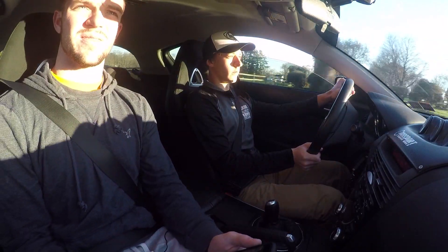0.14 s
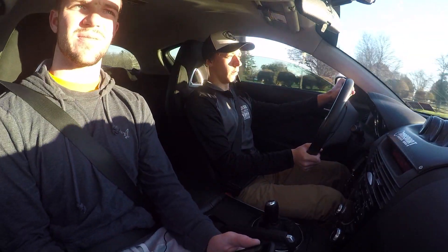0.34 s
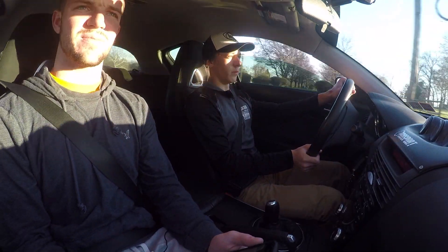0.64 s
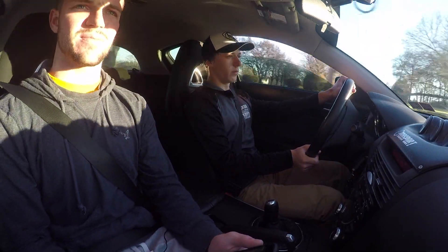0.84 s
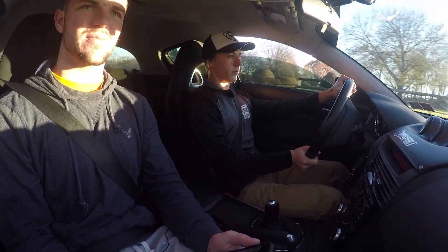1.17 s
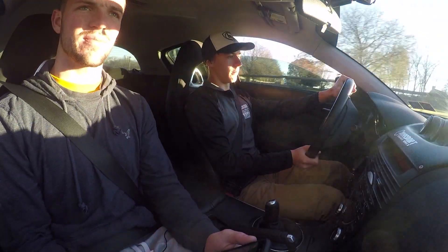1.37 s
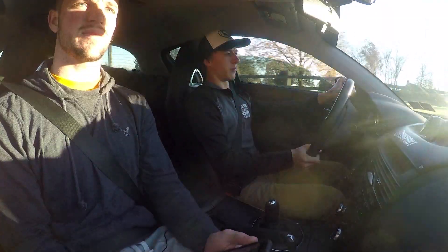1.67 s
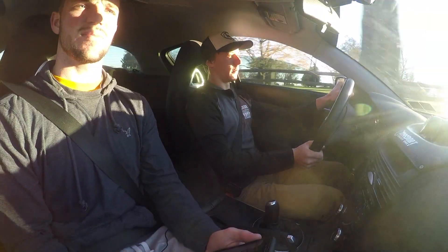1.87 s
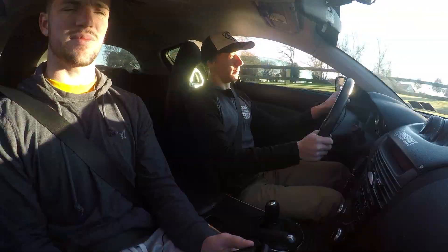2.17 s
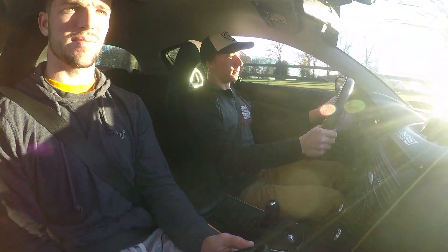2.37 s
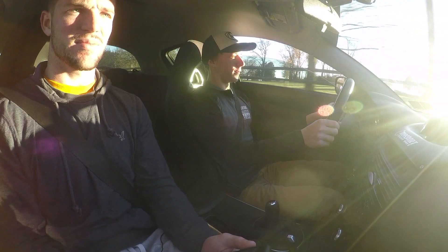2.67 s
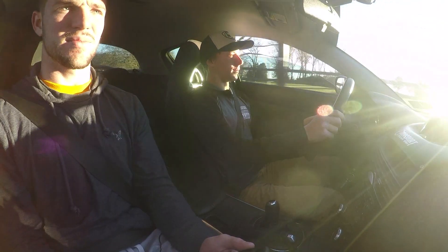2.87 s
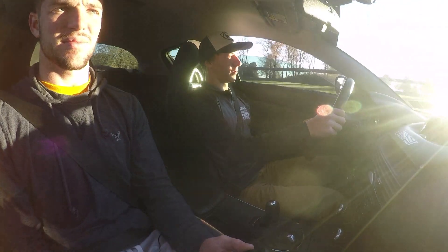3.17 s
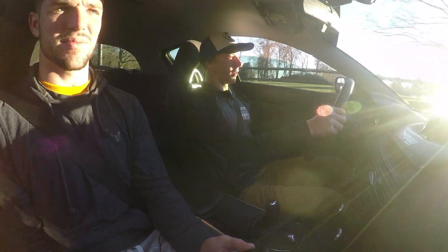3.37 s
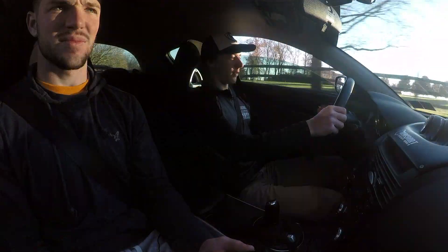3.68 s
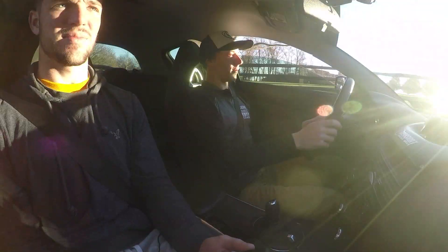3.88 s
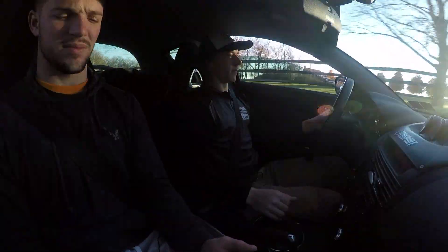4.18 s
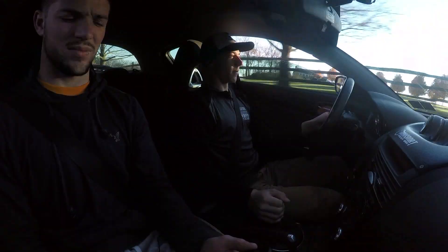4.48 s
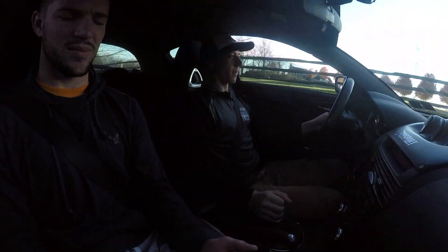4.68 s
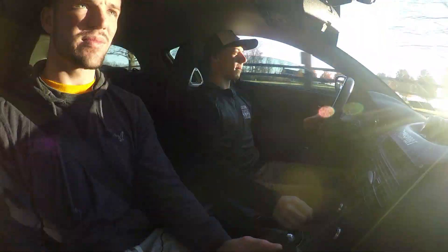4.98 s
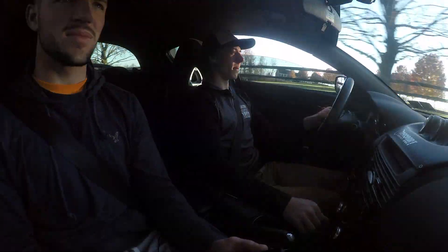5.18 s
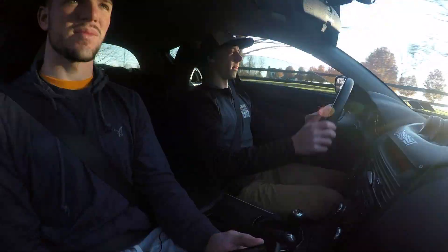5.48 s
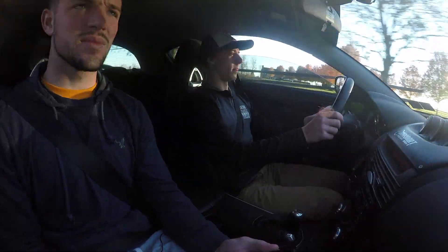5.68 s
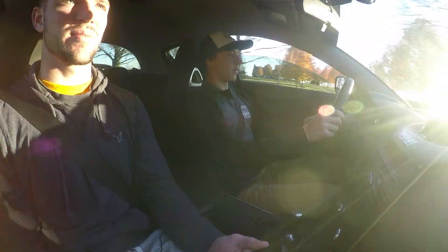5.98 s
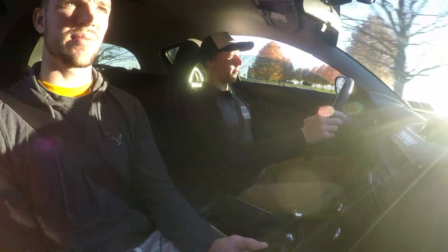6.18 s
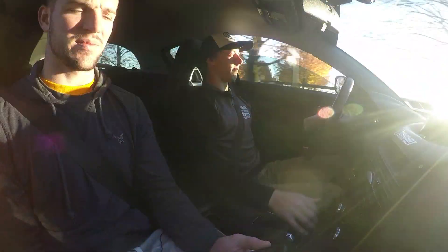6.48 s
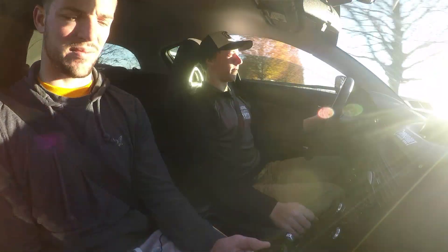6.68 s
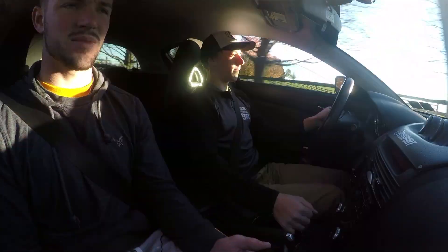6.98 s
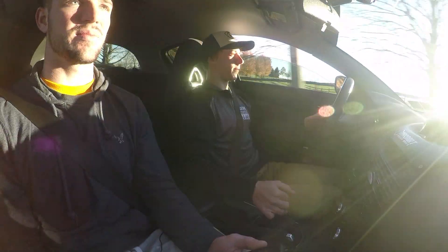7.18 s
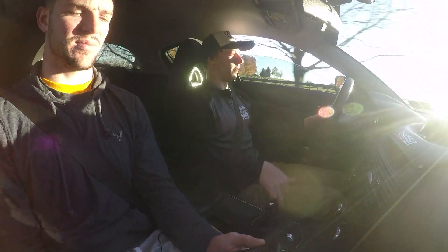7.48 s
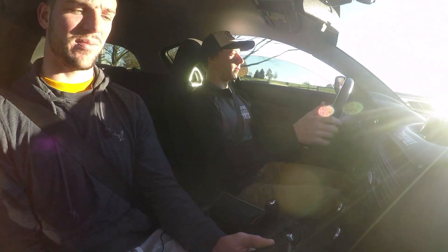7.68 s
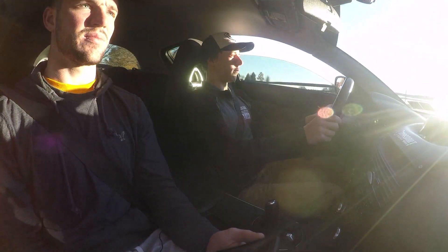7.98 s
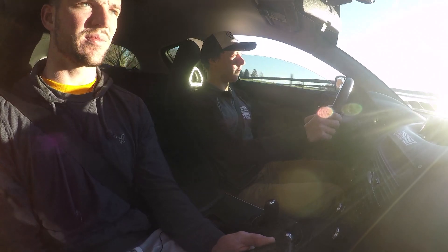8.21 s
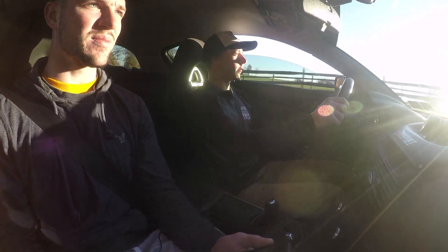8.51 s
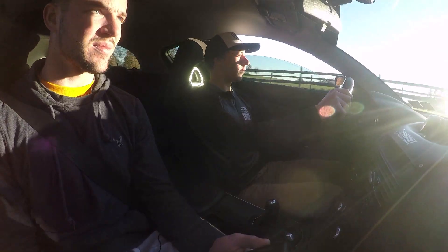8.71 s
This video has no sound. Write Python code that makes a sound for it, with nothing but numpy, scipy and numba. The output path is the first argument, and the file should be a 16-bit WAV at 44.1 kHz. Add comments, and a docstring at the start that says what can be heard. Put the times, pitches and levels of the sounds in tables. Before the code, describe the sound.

A car engine revs hard into a loud, distorted exhaust rasp, then lifts off with thumps and pops and coasts on a drone.

```python
"""On the road, close to the open tailpipe of a moving car with a two-rotor engine.
It pulls hard up the revs: firings boom and bark in the pipe, then steepen into a rasp that overloads
the microphone. It lifts with a thump, pops on the gear change, coasts on a drone and is blipped for a
downshift. A loose fitting squeaks faintly, and tyre and wind roar lie under it all."""
import sys
import numpy as np
from scipy import signal
from scipy.fft import rfft, irfft
from scipy.io import wavfile
from scipy.ndimage import uniform_filter1d
from numba import njit

SR = 44100
rng = np.random.default_rng(int(sys.argv[2]) if len(sys.argv) > 2 else 0)


def waveform_to_disk(signal):
    """Save audio, clipped to [-1, 1], as 16-bit WAV at the path in sys.argv[1]."""
    frames = np.transpose(np.atleast_2d(signal))
    scaled = np.clip(frames, -1, 1) * 32767
    samples = np.round(scaled).astype(np.int16)
    wavfile.write(sys.argv[1], SR, samples)


N = 390279

# firing rate, one firing from each rotor to a shaft turn: t/s, f/Hz
FIRING_RATE = [(0, 158), (.26, 154.2), (.98, 154), (1.12, 156.8), (1.56, 158.6), (2.13, 168.9),
               (2.62, 181.5), (3.95, 219.2), (4.7, 240.5), (5.04, 248.3), (5.51, 209.5), (5.68, 168.9),
               (5.89, 172.8), (6.6, 166.2), (7.17, 155.7), (7.71, 112.7), (7.8, 149.6), (7.89, 196.4),
               (8.03, 196.6), (8.33, 191.6), (8.85, 170.5)]
# engine load for the pull and for the blip: t/s, level/dB re full load
PULL_LOAD = [(.26, -38), (.34, -28), (.5, -23), (1, -19), (1.12, -15.5), (1.8, -11), (2.75, 0.5), (3.5, -1),
             (4.9, 0), (5.03, -3.5)]
BLIP_LOAD = [(7.71, -11), (7.78, -8), (7.82, -5.5), (7.88, -7)]
# open throttle: opens t/s, shuts t/s
THROTTLE_SPANS = [(-.1, 5.047), (7.708, 7.886)]
# exhaust voices by name: level/dB at full load and mid revs, slope/dB per load dB, slope/dB per Hz
EXHAUST_VOICES = {"boom": (-8.5, 0.55, 0), "bark": (-8.5, 0.99, -0.0075), "rasp": (-13, 1.1, -0.014),
                  "hiss": (-28.5, 1.14, 0.081)}
# the boom swells and sags across the pipe's resonances: firing f/Hz, level/dB
BOOM_RESONANCES = [(115, 10), (155, 1.5), (178, 1.3), (198, -2.5), (216, 2), (248, -2.5)]
# the pipe with the throttle shut: firing f/Hz, boom level/dB, overtone level/dB
DRONE_LEVELS = [(115.85, -18.5, -63), (135, -20, -36.5), (159, -19.5, -33.5), (171, -17.5, -30.5),
                (185.2, -18, -33), (194.2, -20.5, -23.5), (200.5, -20.5, -36.5), (212.7, -19, -25.5),
                (224, -25.5, -36.5), (240, -35, -33.5)]
# slugs of gas and afterfire: t/s, thump level/dB, f/Hz at the crest, rise t/s, spit level/dB
AFTERFIRE = [(5.044, -11, 44, 0.02, -41), (5.5848, -7, 75.4, .021, -21), (7.703, -5.5, 65, 0.016, -22),
             (7.76, -15, 70, 0.016, -24.5), (7.88, -12.5, 46.4, 0.024, -46.5), (8.086, -8.5, 58, .016, -31)]
# weak stray firings on the overrun: t/s, level/dB, centre f/Hz, decay t/s
STRAY_FIRINGS = [(5.546, -18, 494, 0.026), (5.952, -19, 1000, 0.0095)]
# the pipe's tone colours for the firing pulses: f/Hz, level/dB
BARK_EQ = [(200, -33), (290, -30), (345, -14.5), (400, -9.5), (460, 4), (510, 2.5), (590, 4.5), (680, -3.5),
           (750, -3), (820, -13.5), (950, -39), (3000, -89.5)]
RASP_EQ = [(400, -20), (570, 4.5), (650, -3.5), (740, -1.5), (900, -20), (1080, -1.5), (1170, 5.5),
           (1320, 2), (1480, -6.5), (1720, -1), (2050, -6), (2250, -12), (2550, -8), (3100, -23.5),
           (3750, -12.5), (4500, -14), (5400, -26.5), (8000, -39)]
DRONE_EQ = [(200, -44), (290, -1.5), (390, 3.5), (500, 2), (600, -11), (700, -3), (850, -30.5), (1300, -23),
            (3500, -71)]
# noise colours of churning gas, exhaust jet, intake, pops, tyres and rushing air: f/Hz, level/dB
CHURN_EQ = [(25, -7.5), (110, 0.5), (280, -15.5), (480, 0.5), (750, -1.5), (920, -19), (1200, -10),
            (1900, -12), (2600, -21), (3500, -39), (9000, -84)]
HISS_EQ = [(1600, -23), (2700, 0), (3350, -6), (4050, -0.5), (4500, -4), (5400, -8.5), (6000, -4),
           (7100, -1), (8200, -8.5), (10000, -14.5), (12800, -26.5), (15000, -43), (17000, -65)]
INTAKE_EQ = [(3000, -41), (3750, -10), (4100, 2), (4300, -9), (4550, -19), (6000, -45.5)]
SPIT_EQ = [(100, 6), (600, 7), (1400, 0), (3000, -6), (4200, -2.5), (5200, -8), (7200, 1), (10000, -13.5),
           (15000, -36)]
TYRE_EQ = [(20, -13.5), (50, 0.5), (80, -4), (260, -2.5), (480, -12.5), (580, -12.5), (800, -13),
           (1100, -8), (1700, -23), (3200, -36.5), (4150, -32.5), (5200, -41.5), (7500, -40), (15000, -72)]
RUSH_EQ = [(600, -26), (1400, 7), (2400, 1.5), (3200, -16.5), (5200, -19.5), (7500, -23), (10500, -29),
           (15000, -50)]
# jolts that rub the loose fitting: t/s, level/dB
JOLTS = [(.685, -60), (1.085, -49), (1.105, -50), (5.1, -51), (5.2, -51), (5.23, -50), (5.9, -49.5)]
# rough road that sets off fainter squeaks: from t/s, to t/s, level/dB
ROUGH_STRETCHES = [(0.353, 1, -52), (8.253, 8.65, -53)]
# the fitting's ring: f/Hz, level/dB
FITTING_MODES = [(9060, -1.5), (9750, -8)]
# the car gathers speed, then slows: t/s, roar level/dB, buffeting level/dB
ROAD_LEVELS = [(0, -35.5, -41), (2, -30, -46), (4, -27.5, -38), (5.8, -28.5, -34.5), (8.85, -32, -44)]

MID_REVS_HZ = 169
SHUDDER_HZ, SHUDDER_DEPTH_HZ, SHUDDER_CREST_S = 4.08, 0.44, 1.225
LIGHT_LOAD_DB, LIGHT_LOAD_SLOPE = -21.5, 0.42
BARK_LOAD_DB, BARK_KNEE_DB, BARK_SOFT_DB, BARK_FLOOR_DB = -18, 3.5, -10, -41.5
EDGE_HZ, EDGE_MIN_HZ, EDGE_LOAD_DB_PER_OCTAVE, EDGE_OCTAVES_PER_HZ = 3270, 1060, 9, 0.0014
INTAKE_DB, INTAKE_BY_LOAD = -41.5, 0.78
CHOKE_DB, CHOKE_S = -12, 0.038
SQUEAKS_PER_S = 8.7
TOP_HZ = 15300


def on_throttle(phase, hz):
    """Firings ring the pipe: boom, bark, rasp and hiss each ride the load and the revs."""
    load_db, = curves(list(PULL_LOAD) + list(BLIP_LOAD))
    revving = hz - MID_REVS_HZ
    boom_db, bark_db, rasp_db, hiss_db = (
        db + by_load * load_db + by_revs * revving for db, by_load, by_revs in EXHAUST_VOICES.values())
    boom_db += np.interp(hz, *np.transpose(BOOM_RESONANCES))
    boom_db += np.minimum(load_db - LIGHT_LOAD_DB, 0) * LIGHT_LOAD_SLOPE
    # the bark breaks out once the load passes a threshold
    held_back = .5 - .5 * np.tanh((load_db - BARK_LOAD_DB) / BARK_KNEE_DB)
    bark_db = np.maximum(bark_db + BARK_SOFT_DB * held_back, BARK_FLOOR_DB)
    # as the revs climb the rotors pull less alike and the gas churns harder
    low = boom(phase + 0.027, uneven_db=-26 + 0.12 * revving, flutter_db=0.38,
               octave_db=-27.5 - 0.67 * np.maximum(revving, -15))
    churn = noise(CHURN_EQ) * (1 + .5 * np.cos(2 * np.pi * (phase - .2))) * undb(-22.5 + 0.18 * revving)
    bark = steady(colour(pulses(phase, (1, .72), scatter_db=0.33, jitter_s=1e-5), BARK_EQ))
    fronts = pulses(phase, (1, 0), scatter_db=.5, jitter_s=5e-6)
    rasp = shock_rasp(fronts, phase, load_db, revving)
    # at high revs the hiss covers the ring of the pipe wall
    hiss = jet_hiss(phase, revving)
    zing = steady(wall_ring(fronts, decay_s=0.0065)) * undb(-6 - 0.007 * revving)
    # a thin hum at nine times the shaft rate stands out on a light throttle
    hum_db = np.minimum(bark_db + 3, -39) + 1.6 * walk(13)
    hum = np.sin(9 * np.pi * phase) * undb(hum_db)
    body = low * undb(boom_db) + (bark + churn) * undb(bark_db) + hum
    return body + rasp * undb(rasp_db) + (hiss + zing) * undb(hiss_db) + intake_whistle(load_db)


def pulses(phase, rotors, scatter_db, jitter_s):
    """One pressure pulse a firing, no two alike; the rotors take turns at their own strengths."""
    firing = np.arange(1, int(phase[-1]))
    chance = rng.standard_normal((2048, 2))[firing]
    on_time = np.interp(firing, phase, np.arange(N))
    at = np.clip(on_time + jitter_s * SR * chance[:, 0], 0, N - 2)
    size = np.array(rotors)[firing % 2] * undb(scatter_db * chance[:, 1])
    sample, fraction = at.astype(int), at % 1
    return -np.bincount(sample, size * (1 - fraction), N) - np.bincount(sample + 1, size * fraction, N)


def boom(phase, uneven_db, flutter_db, octave_db):
    """The gas column swings, round and lopsided, at the firing rate and more weakly at the shaft rate."""
    swing = np.sin(2 * np.pi * phase) + undb(octave_db) * np.sin(4 * np.pi * phase)
    shaft = np.sin(np.pi * phase + .5 * walk(30)) * undb(uneven_db + 1.3 * walk(40))
    return -np.sqrt(2) * (swing * undb(flutter_db * walk(70)) + shaft)


def shock_rasp(fronts, phase, load_db, revving):
    """One rotor's pulse steepens into a shock front, brighter with load and revs."""
    edge_octaves = load_db / EDGE_LOAD_DB_PER_OCTAVE + EDGE_OCTAVES_PER_HZ * revving
    edge_hz = np.maximum(EDGE_HZ * 2 ** edge_octaves, EDGE_MIN_HZ)
    # the other rotor's front stays rounder and gains weight with the revs
    weight = np.clip(0.43 + .018 * revving, .12, .78)
    rounded = weight * pulses(phase, (0, 1), scatter_db=-0.1, jitter_s=1.2e-5)
    both = lowpass(fronts, edge_hz) + lowpass(rounded, np.minimum(edge_hz, 1400))
    return steady(colour(both, RASP_EQ))


def jet_hiss(phase, revving):
    """The exhaust jet hisses most on each outward swing."""
    puff = 1 + 0.35 * np.cos(2 * np.pi * (phase - .78))
    hiss = steady(noise(HISS_EQ) * puff)
    return hiss * undb(-3.5 + 0.015 * revving + 1.066 * walk(90) + 0.43 * walk(16))


def wall_ring(fronts, decay_s):
    """The steel pipe answers each front with a short, dense ring in the treble."""
    t = np.arange(int(.03 * SR)) / SR
    ring = noise(HISS_EQ)[-len(t):] * np.exp(-t / decay_s)
    return signal.fftconvolve(fronts, ring)[:N]


def intake_whistle(load_db):
    """Air drawn past the open throttle whistles in a narrow band."""
    return noise(INTAKE_EQ) * undb(INTAKE_DB + INTAKE_BY_LOAD * load_db)


def off_throttle(phase, hz):
    """The coasting pipe drones: a clean boom and soft overtones, choked briefly by each pop."""
    rate_hz, *levels = np.transpose(DRONE_LEVELS)
    boom_db, tone_db = (np.interp(hz, rate_hz, db) for db in levels)
    t = np.arange(N) / SR
    choke = sum(np.exp(-((t - s - rise_s) / CHOKE_S) ** 2) for s, _, _, rise_s, _ in AFTERFIRE)
    firings = pulses(phase, (1, .8), scatter_db=.7, jitter_s=2e-5)
    tones = steady(colour(firings, DRONE_EQ))
    low = boom(phase, uneven_db=-27.5 + 0.46 * np.maximum(hz - 180, 0), flutter_db=0, octave_db=-36.5)
    return (low * undb(boom_db) + tones * undb(tone_db)) * undb(CHOKE_DB * choke)


def pops():
    """Each slug of gas heaves the pipe in a ragged thump of sinking pitch, and spits at its crest."""
    out, t = np.zeros(N), np.arange(N) / SR
    spit = noise(SPIT_EQ) * undb(1.63 * walk(250))
    ragged = noise([(20, -16), (90, 0.5), (220, -4), (500, -25), (2000, -61)]) * undb(-9)
    for s, db, hz, rise_s, spit_db in AFTERFIRE:
        age = np.maximum(t - s, 0) / rise_s
        swell = age ** 2 * np.exp(1 - age ** 2)
        cycles = hz * rise_s * 4 * np.log1p(age / 3)
        thump = np.sqrt(swell) * (ragged - np.sin(2 * np.pi * cycles))
        sizzle = swell ** 2 + 0.15 * np.minimum(age, 1) * np.exp(-age / 2)
        out += undb(db) * thump + undb(spit_db) * sizzle * spit
    return out


def burbles():
    """Stray firings on the overrun come out as soft, hollow puffs."""
    out, t = np.zeros(N), np.arange(N) / SR
    for s, db, hz, decay_s in STRAY_FIRINGS:
        age = np.maximum(t - s, 0)
        puff = np.minimum(age / 0.0072, 1) * np.exp(-age / decay_s)
        out += undb(db) * puff * noise([(hz / 4, -30), (hz, 0), (hz * 2, -17), (hz * 10, -65)])
    return out


def squeaks():
    """Each rub makes the loose fitting ring for a moment with an unsteady pitch."""
    t = np.arange(N) / SR
    rubs = list(JOLTS)
    for start, end, db in ROUGH_STRETCHES:
        times = start + np.cumsum(rng.exponential(1 / SQUEAKS_PER_S, size=12))
        rubs += [(s, db) for s in times if s < end]
    envelope = sum(undb(db) * np.exp(-((t - s) / 0.013) ** 2) for s, db in rubs)
    ring = sum(undb(db) * np.sin(2 * np.pi * np.cumsum(hz + 110 * walk(600)) / SR)
               for hz, db in FITTING_MODES)
    return envelope * ring * undb(4.3 * walk(200))


def road():
    """Tyres roar, rushing air swells more steeply with speed, and the wake buffets the microphone."""
    road_db, wake_db = curves(ROAD_LEVELS)
    tyres = noise(TYRE_EQ) * undb(0.75 * walk(14))
    rush = noise(RUSH_EQ) * undb(road_db + 19 + 1.4 * walk(5.4))
    wake = noise([(12, -7), (28, 2.5), (70, -10), (200, -27), (800, -63.5)])
    return (tyres + rush) * undb(road_db) + wake * undb(wake_db + 3.6 * walk(10))


def undb(db):
    """Decibels to gain."""
    return 10 ** (np.asarray(db) / 20)


def curves(rows):
    """Each column of a table as an automation lane of straight ramps."""
    s, *columns = np.transpose(rows)
    return [np.interp(np.arange(N) / SR, s, c) for c in columns]


def colour(x, points):
    """Minimum-phase EQ through points of f/Hz, level/dB."""
    size = 16384
    hz, db = np.transpose(points)
    bin_hz = np.arange(size // 2 + 1) * SR / size
    log_gain = np.log(undb(np.interp(np.log(bin_hz + 1), np.log(hz), db)))
    cepstrum = irfft(log_gain)
    cepstrum[1:size // 2] *= 2
    cepstrum[size // 2 + 1:] = 0
    return signal.fftconvolve(x, irfft(np.exp(rfft(cepstrum))))[:N]


def steady(x, size=1500):
    """Hold the short-term rms at 1."""
    return x / np.sqrt(np.abs(uniform_filter1d(uniform_filter1d(x * x, size), size)) + 1e-18)


def noise(points):
    """Coloured noise of rms 1."""
    x = colour(rng.standard_normal(N), points)
    return x / x.std()


def walk(rate):
    """Random drift with a spread near 1, at `rate` steps a second."""
    steps = rng.standard_normal(4096)
    return np.interp(np.arange(N) / SR * rate, np.arange(len(steps)), steps)


@njit
def lowpass(x, hz):
    """Two-pole low-pass with a moving corner."""
    y, band_state, low_state = np.empty(len(x)), 0., 0.
    for i in range(len(x)):
        g = np.tan(np.pi * min(hz[i], .4 * SR) / SR)
        band = (band_state + g * (x[i] - low_state)) / (1 + g * (g + 1.3))
        y[i] = low_state + g * band
        band_state, low_state = 2 * band - band_state, 2 * y[i] - low_state
    return y


def scene():
    """The throttle crossfades the exhaust between its loud and its coasting voice, over the road bed."""
    t = np.arange(N) / SR
    throttle = sum(np.clip((t - opens) / 0.00301, 0, 1) * np.clip((shuts - t) / 0.011 + .5, 0, 1)
                   for opens, shuts in THROTTLE_SPANS)
    # under load the driveline shudders and rocks the firing rate
    shudder = SHUDDER_DEPTH_HZ * np.cos(2 * np.pi * SHUDDER_HZ * (t - SHUDDER_CREST_S))
    hz = curves(FIRING_RATE)[0] + throttle * shudder
    phase = np.cumsum(hz * (1 + 0.000682 * walk(22))) / SR  # counts firings
    coasting = (1 - throttle) * off_throttle(phase, hz)
    pulling = throttle * on_throttle(phase, hz)
    return (pulling + coasting + pops() + burbles() + squeaks() + road())[None]


def record(dry):
    """Overload rounds off peaks near full scale; filters block steady pressure and cut the top."""
    rounded = dry / (1 + (dry / 1.03) ** 8) ** (1 / 8)
    centred = signal.sosfilt(signal.butter(1, 3, "high", fs=SR, output="sos"), rounded)
    return signal.sosfilt(signal.ellip(8, .2, 70, TOP_HZ, fs=SR, output="sos"), centred)


dry = scene()
out = record(dry)
waveform_to_disk(out)
```